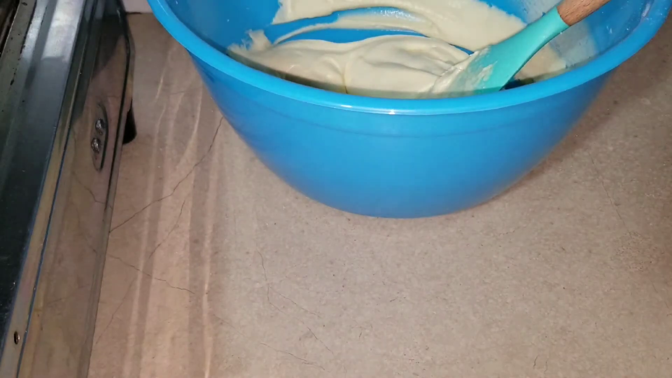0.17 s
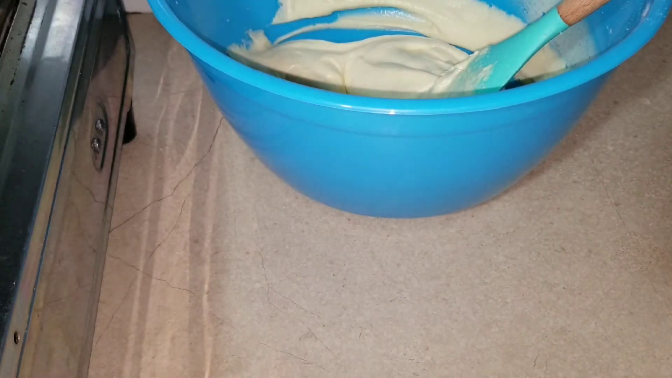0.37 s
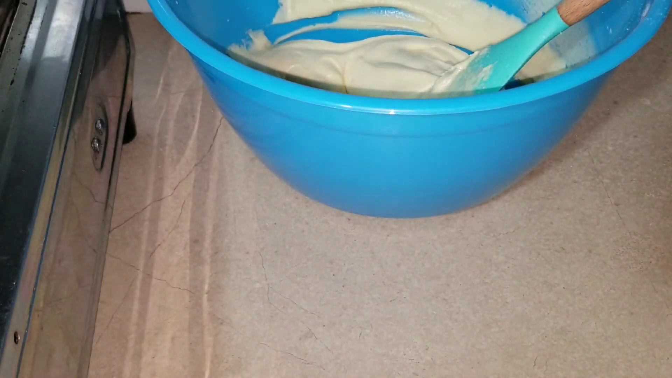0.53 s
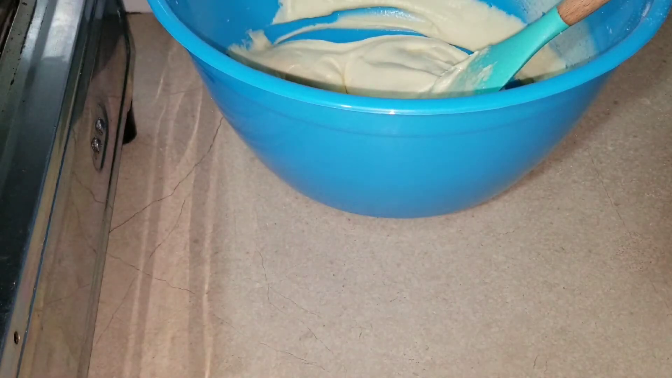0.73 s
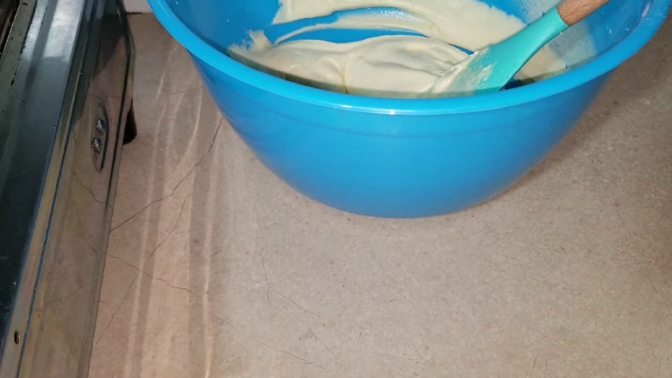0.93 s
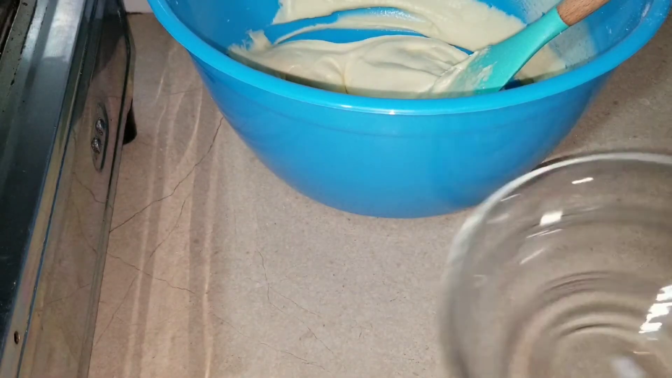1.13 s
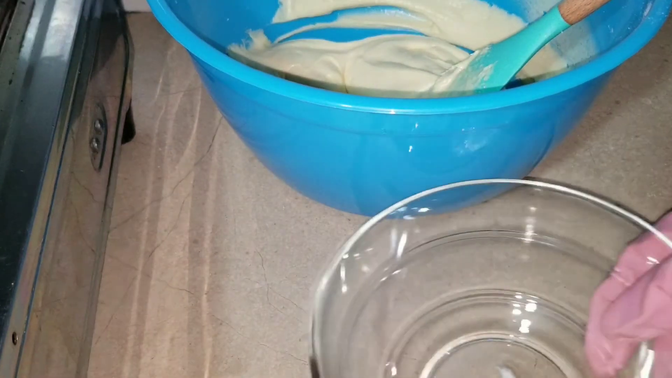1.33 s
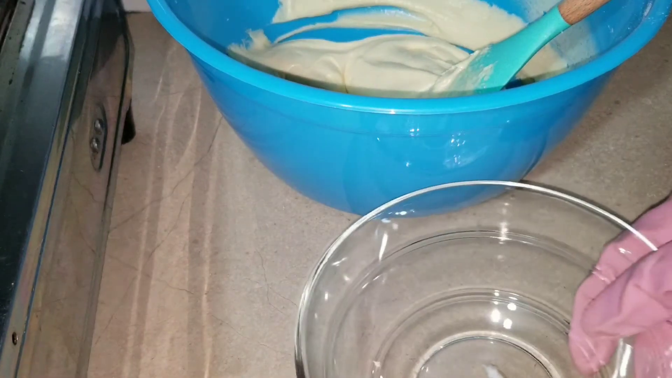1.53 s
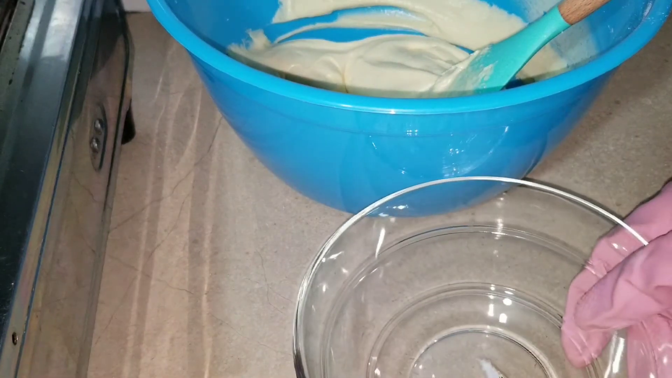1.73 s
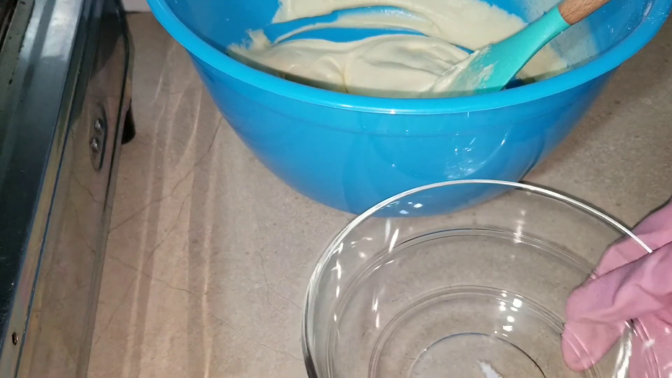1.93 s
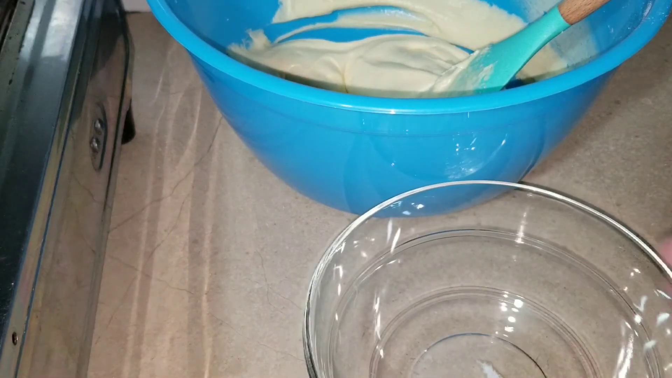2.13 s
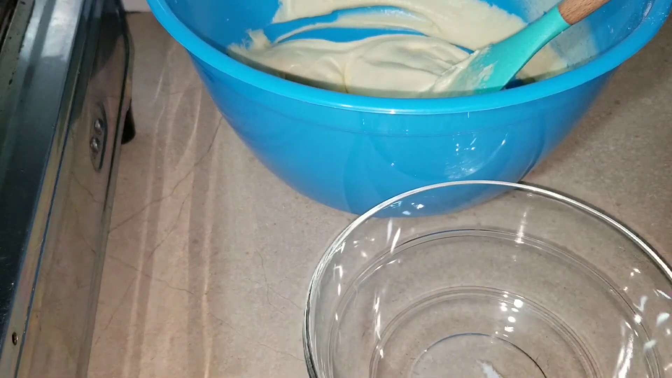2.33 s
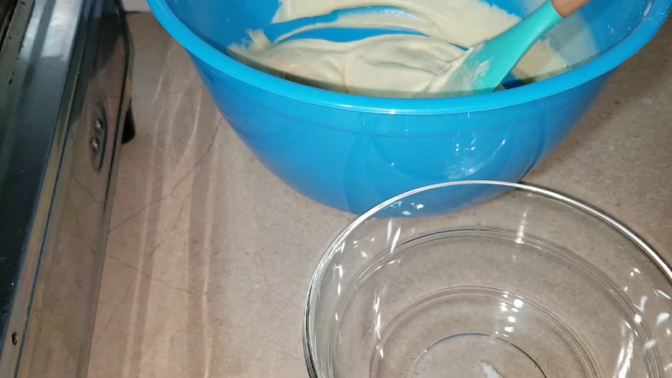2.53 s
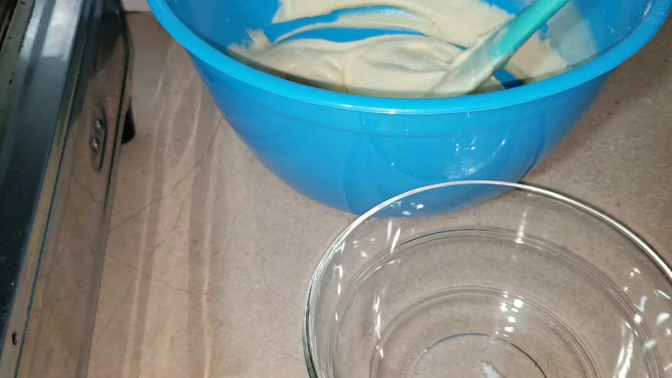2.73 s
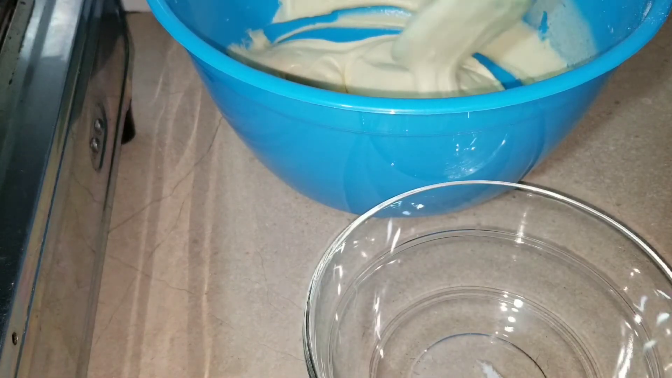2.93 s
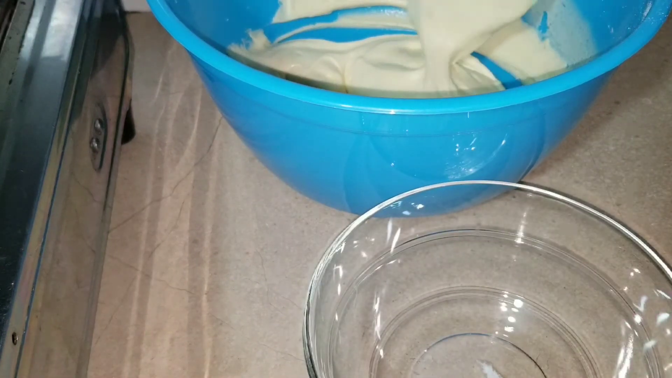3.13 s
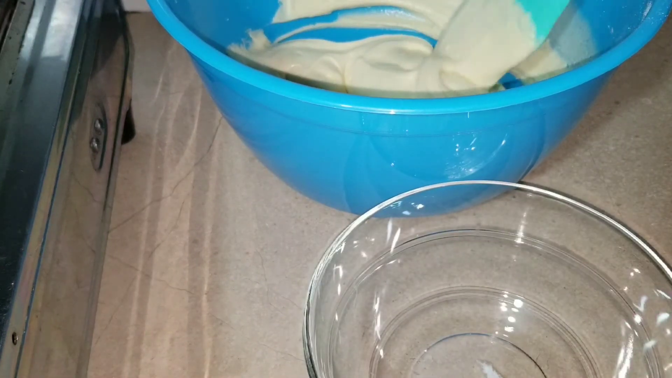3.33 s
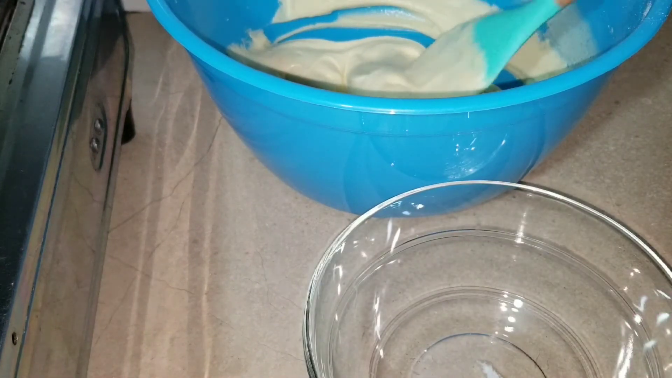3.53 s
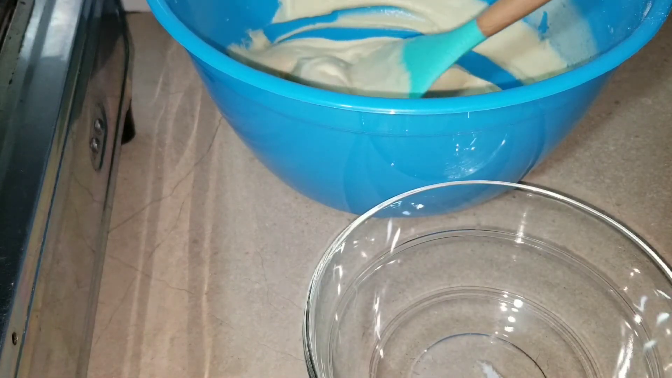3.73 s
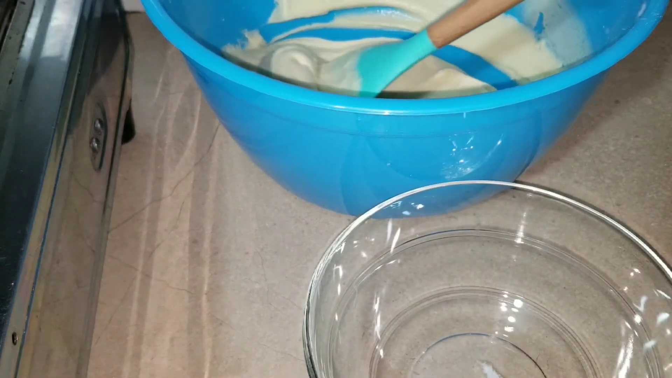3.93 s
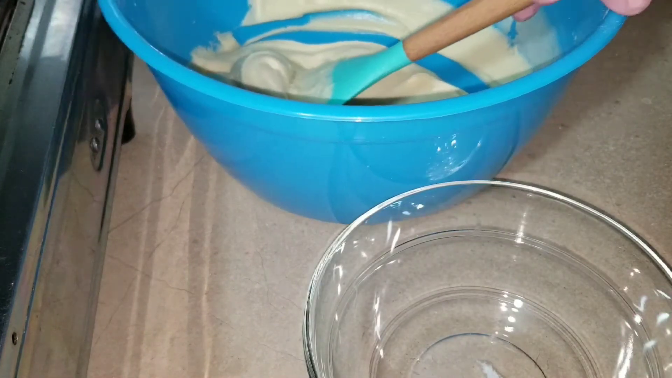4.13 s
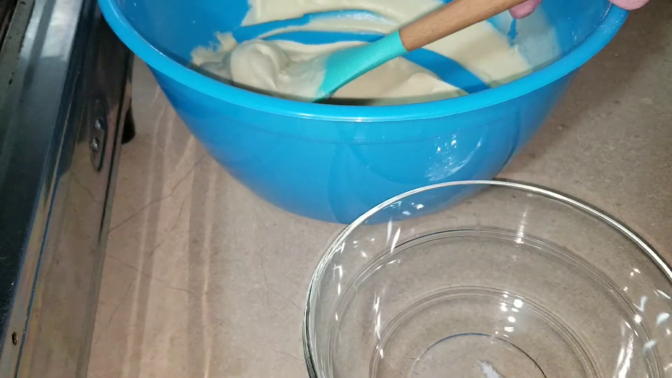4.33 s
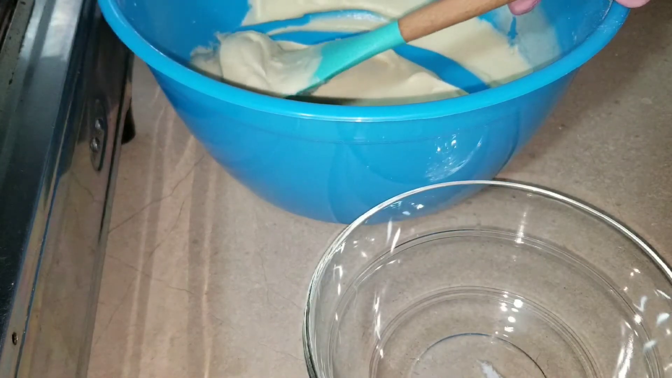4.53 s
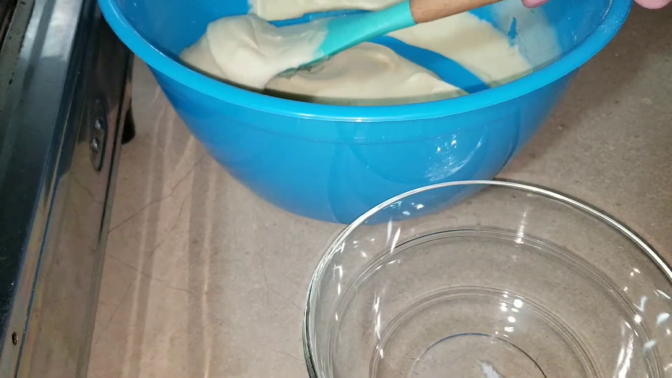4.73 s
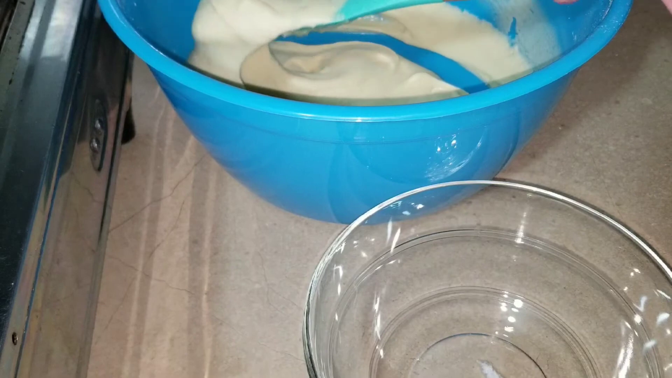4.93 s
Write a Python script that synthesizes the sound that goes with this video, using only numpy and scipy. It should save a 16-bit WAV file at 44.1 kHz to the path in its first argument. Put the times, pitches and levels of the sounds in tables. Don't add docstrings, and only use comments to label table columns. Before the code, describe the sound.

Faint fridge throbbing, building hum and a passing vehicle's low drone come first. Then a heavy glass bowl rattles down onto a solid counter, hard knocks crowding together with short high ringing, and settles once more. Afterwards come light glove rustles, little ticks, two dull thuds of a spatula in a plastic bowl and a short soft wipe. Small indoor room, close stereo microphone, sources right of centre.

```python
import sys
import numpy as np
from scipy import signal
from scipy.io import wavfile

SR = 44100
rng = np.random.default_rng(int(sys.argv[2]) if len(sys.argv) > 2 else 0)


def gain_from_decibels(decibels):
    exponent = np.asarray(decibels, float) / 20
    return 10 ** exponent


def digitize_waveform(pressure):
    field = np.atleast_2d(pressure).T
    bounded = np.clip(field, -1, 1)
    quanta = np.round(bounded * 32767).astype(np.int16)
    wavfile.write(sys.argv[1], SR, quanta)


N = 223656

# time in seconds, level in dB.
TRAFFIC = [(0, -50), (.5, -48.5), (.75, -52.5), (1.3, -54), (2.0, -51), (2.4, -51), (2.65, -55),
           (3.5, -53.5), (4.5, -54.5), (5.07, -51.5)]
# frequency in Hz, level in dB per Hz.
RUMBLE_COLOUR = [(12, -46), (20, -10.5), (49, -4.5), (75, -4), (115, -3.5), (178, -21), (201, -11.5),
                 (256, -6.5), (295, -18), (345, -7), (383, -17), (582, -13), (705, -22.5), (826, -29.5),
                 (1300, -64), (1690, -76), (2860, -120)]
HISS_COLOUR = [(530, -38), (900, -2), (1370, -12), (1840, -4), (1990, -5), (4300, -5.5), (5970, -11.5),
               (12600, -5), (13500, -16)]
HISS_DB = -80
# frequency in Hz, likeness (1 is identical).
LIKENESS = [(60, 0.98), (150, 0.84), (370, 0.89), (900, -0.74), (2220, 0.081), (5480, -0.28), (13500, -1.1)]
# frequency in Hz, left minus right in dB.
LEAN = [(60, -3.5), (180, -1), (520, -8.5), (1550, -0.5), (4580, -3.5), (13500, 0)]
HUM_HZ = [51.86, 98.7, 122.7]
# middle in seconds, length in seconds, level in dB.
HUM_SWELLS = [
    [(.27, .4, -50), (1.0, .2, -62), (1.38, .15, -57), (1.85, .3, -57), (2.4, .17, -50), (2.7, .25, -47),
     (3.3, .4, -49), (3.65, .3, -47), (4.25, .6, -57), (5.0, .4, -52)],
    [(.35, .35, -53), (1.0, .2, -68), (2.57, .2, -44), (3.05, .35, -49), (3.4, .15, -52), (4.97, .15, -53)],
    [(.42, .5, -47), (1.0, .25, -62), (1.82, .15, -48), (2.28, .15, -49), (2.62, .22, -44),
     (3.15, .15, -49), (4.0, .3, -57), (4.6, .3, -55)],
]
# frequency in Hz, width in Hz, level in dB.
FRIDGE_TONES = [(201.1, 24, -66.5), (254.4, 10, -70), (571, 4.7, -80)]
# seconds into the turn, level in dB.
PUMP_KNOCKS = [(.015, -61), (.027, -60), (.054, -56), (.076, -61)]
# frequency in Hz, level in dB, 60 dB decay in seconds, left minus right in dB.
PUMP_CASING = [(95, 3.0, .12, -2.5), (215, 1.5, .12, -.6), (510, -6, .07, -5), (580, 1.5, .06, -8)]
PUMP_TURNS_PER_S, PUMP_SOFT_HZ = 10.36, 720
# time in seconds, firing frequency in Hz, level in dB.
ENGINE = [(0, 41.84, -53), (.3, 41.45, -48.5), (.6, 40.71, -55.5), (.9, 39.15, -55), (1.2, 38.64, -55),
          (1.5, 38, -71)]
# multiple of the firing frequency, level in dB.
ENGINE_ORDERS = [(3, 0), (4, -3), (5, -6), (6, -8), (7, -8), (8, -14), (9, -12), (10, -12), (12, -13)]
# peak in seconds, level in dB, crackly top relative to the body in dB.
RUSTLES = [(0, -69, 4), (.15, -79, 6), (.33, -79, 3), (.5, -79, 3), (.59, -77, 3), (1.1, -97, 17),
           (1.58, -68, -2), (1.87, -66, -6), (2.03, -76, 3), (2.2, -74, 7), (2.42, -66, -4), (2.6, -83, 8),
           (2.75, -85, 7), (2.92, -80, 4), (3.17, -75, -5), (3.43, -75, 0), (3.6, -82, -3), (3.96, -70, -7),
           (5.06, -75, -8)]
RUSTLE_RISE, RUSTLE_FALL, RUSTLE_REST_DB = 130, 95, -95
# full pressure from and until in seconds, level in dB, rise and fall in dB per second.
WIPE = (3.872, 4.012, -50.5, 380, 320)
# frequency in Hz, level in dB per Hz.
WIPE_COLOUR = [(650, -38), (1100, -15), (1780, -12), (1880, -3), (4070, -6.5), (4860, -2.5), (11900, -1),
               (13400, 2)]
# start in
# seconds, peak in dB, body frequency in Hz, top relative to the peak in dB, contact length in seconds.
TOUCHES = [(2.0313, -44, 1680, -27, .0019), (2.1535, -46.5, 2085, -11, .0023),
           (2.171, -44.5, 2110, -14.5, .0016), (2.2247, -46.5, 2780, -19, .0015),
           (2.3495, -55.5, 2260, -17, .0031), (2.385, -35, 1960, -4.5, .0016), (2.419, -49.5, 1700, -9, .0027),
           (2.485, -59, 2010, -16, .002), (3.321, -61, 2660, -22, .0014), (3.3907, -40, 2350, -36, .0028),
           (3.436, -52, 1950, -17, .006), (3.4727, -37.5, 2100, -22, .0003), (5.022, -60, 1843, -21, .0042),
           (0.556, -59, 1080, -7, .014),
    (1.059, -55.5, 6800, -7.5, .013),
    (3.097, -24, 1010, -24, .0028),
]
# time in seconds, left minus right in dB.
HAND_SIDE = [(.6, -13), (1.1, -3), (2.2, -11.5), (3.1, -8), (5, -4)]
# start in seconds, frequency in Hz, level in dB, 60 dB decay in seconds.
TICKS = [
    (.325, 1850, -62, 0.072),
    (0.486, 1760, -59, 0.068),
    (.6, 8450, -61.5, 0.13),
    (1.984, 7800, -63, .03),
]
# start in seconds, peak in dB.
SPATULA_THUDS = [
    (3.099, -32.5),
    (3.393, -36.5),
]
# frequency in Hz, level in dB, 60 dB decay in seconds.
PLASTIC = [(263, -2, 0.0983), (453, 0.5, 0.066), (578, -9, 0.1), (1700, -2, 0.03), (2850, 4, 0.022)]
# frequency in Hz, 60 dB decay in seconds.
KITCHEN_T60 = [(150, 0.3), (600, 0.24), (1500, 0.24), (4000, 0.24), (10000, 0.0746)]
# frequency in Hz, level in dB.
KITCHEN_COLOUR = [(400, 0.0), (600, -3.5), (850, -2.5), (1200, 2.5), (2200, 0.0), (3400, -1.0), (6000, 1.0)]
# time in seconds, knock level in dB, knock frequency in Hz.
BOUNCES = [(1.4465, -12.5, 950), (1.4975, -12, 960), (1.5265, -15, 940), (1.547, -18.5, 940),
           (1.560, -18.5, 900), (1.5745, -24, 800), (1.8125, -15, 1070), (1.8155, -16, 1100),
           (1.821, -21, 1050), (1.830, -23, 1000), (1.8415, -23, 930), (1.849, -25, 930)]
# multiple of the knock frequency, level in dB.
COUNTER = [(.45, -13.5), (.7, -16.5), (1, 2.5), (1.3, -7), (1.65, -6), (2.0, 0), (2.5, -8), (3.3, -7)]
COUNTER_CYCLES = 8
# time in seconds, left minus right in dB.
BOWL_SIDE = [(1.5, -8), (1.8, -5.5)]
SLAP_S, SLAP_DB = 0.0051, -5
# time in seconds, peak in dB.
THUMPS = [
    (1.446, -22),
    (1.496, -31.5),
    (1.524, -34),
    (1.812, -54),
]
# frequency in Hz, level in dB, 60 dB decay in seconds.
CABINET = [(127.4, -2, .35), (215, -19, 0.75), (334, -10, 0.1984), (521.6, -10, 0.1)]
# time in seconds, crack level in dB, then low, middle and top family in dB.
CLINKS = [
    (1.448, -35, -50, -56, -40),
    (1.4986, -35.5, -41, -66, -46.5),
    (1.528, -30.5, -34.5, -36, -42),
    (1.815, -30.5, -36, -53, -33.5),
    (1.820, -40, -48.5, -52.5, -46.5),
]
# frequency in Hz, level in dB, 60 dB decay in seconds.
GLASS = [
    [(4830, -22, .05), (5552, -1, .165), (5615, -5, .13), (5800, -9, .04), (6900, -18, .03)],
    [(7550, -16, .1), (8430, 0, .15), (8520, -4, .18)],
    [(9420, -10, .16), (9800, -5, .1), (10000, -1, .14), (11200, -3, .1), (12040, -6, .08),
     (12370, -10, .1)],
]
# frequency in Hz, level in dB, 60 dB decay in seconds.
RIM = [(340, -52, 1.4), (708, -44, .6), (1585, -39, .4)]
RELEASE_S = 1.882
LEFT_LAG = 6
STEP_HZ, STEP_DB, CUTOFF_HZ = 7750, -5, 13200


def rms_one(x):
    return x / np.sqrt(np.mean(x ** 2) + 1e-20)


def in_time(rows):
    s, *columns = np.transpose(rows)
    return [np.interp(np.arange(N) / SR, s, column) for column in columns]


def at_hz(points, hz):
    known_hz, values = np.transpose(points)
    return np.interp(np.log(hz), np.log(known_hz), values)


def pan(db):
    return gain_from_decibels(np.multiply.outer([.5, -.5], db))


def drift(rate):
    r = np.exp(-80 * np.pi * rate / SR)
    slow = signal.lfilter([1], [1, -2 * r, r * r], rng.standard_normal(N // 40 + 2002))[2000:]
    return np.interp(np.arange(N) / 40, np.arange(len(slow)), rms_one(slow - slow.mean()))


def swell(start, end, db, rise, fall):
    t = np.arange(N) / SR
    early, late = np.clip(start - t, 0, 9), np.clip(t - end, 0, 9)
    return gain_from_decibels(db - rise * early - fall * late)


def ring(x, hz, t60):
    r, w = gain_from_decibels(-60 / (t60 * SR)), 2 * np.pi * hz / SR
    return signal.lfilter([0, np.sin(w)], [1, -2 * r * np.cos(w), r * r], x + 1e-18)


def strike(times, gains, modes, spread_db):
    at, out = np.round(np.asarray(times) * SR).astype(int), np.zeros((2, N))
    luck = rng.standard_normal((len(at), len(modes), 3))
    for k, (hz, db, t60) in enumerate(modes):
        uneven_db = spread_db * (luck[:, k, 0] + .7 * luck[:, k, 1:].T)
        clicks = np.zeros((2, N))
        clicks[:, at] = gains * gain_from_decibels(db + uneven_db) * (-1) ** k
        out += ring(clicks, hz, t60)
    return out


def coloured(spectrum, patchy_db):
    first, last = spectrum[0][0], min(spectrum[-1][0], 14000)
    edges = np.geomspace(first, last, round(3 * np.log2(last / first)) + 1)
    out, white = 0, rng.standard_normal((2, 2, N))
    for k, (low, high) in enumerate(zip(edges, edges[1:])):
        band = signal.butter(2, [low, high], "band", fs=SR, output="sos")
        mid, side = signal.sosfilt(band, white[k % 2])
        hz = np.sqrt(low * high)
        alike = np.clip(at_hz(LIKENESS, hz), 0, 1)
        gain = gain_from_decibels(at_hz(spectrum, hz) + patchy_db * drift(9)) * pan(at_hz(LEAN, hz))[:, None]
        out = out + gain * (np.sqrt(1 + alike) * mid + np.sqrt(1 - alike) * side * [[1], [-1]])
    return rms_one(out)


def traffic_and_hiss():
    rumble = gain_from_decibels(in_time(TRAFFIC)[0]) * coloured(RUMBLE_COLOUR, patchy_db=3.0)
    return rumble + gain_from_decibels(HISS_DB + 5) * coloured(HISS_COLOUR, patchy_db=.7)


def building_hum():
    t, out = np.arange(N) / SR, 0
    for hz, rows in zip(HUM_HZ, HUM_SWELLS):
        turn = 2 * np.pi * np.cumsum(hz * (1 + 0.036 * drift(6))) / SR
        tone = np.sqrt(2) * gain_from_decibels(0.92 * drift(10)) * np.sin(turn) * pan(-2.0)[:, None]
        gain = sum(gain_from_decibels(db - np.minimum(24 * ((t - s) / length) ** 2, 200)) for s, length, db in rows)
        out = out + gain_from_decibels(-1.8) * gain * tone
    return out


def fridge_tones():
    out = 0
    for hz, width_hz, db in FRIDGE_TONES:
        noise = rng.standard_normal(N) + 0.25 * rng.standard_normal((2, N))
        t60 = np.log(1000) / (np.pi * width_hz)
        out = out + gain_from_decibels(db) * rms_one(ring(ring(noise, hz, t60), hz, t60))
    return out


def fridge_pump():
    turns = np.arange(-2, N / SR * PUMP_TURNS_PER_S) / PUMP_TURNS_PER_S
    s, db = np.transpose(PUMP_KNOCKS)
    at = ((turns[:, None] + s + 1) * SR).astype(int)
    clicks = np.zeros(N + 2 * SR)
    clicks[at] = gain_from_decibels(db + 1.5 * rng.standard_normal(at.shape))
    clicks = signal.sosfilt(signal.butter(6, PUMP_SOFT_HZ, fs=SR, output="sos"), clicks + 1e-18)
    out = 0
    for hz, level_db, t60, side_db in PUMP_CASING:
        out = out + gain_from_decibels(level_db) * pan(side_db)[:, None] * ring(clicks, hz, t60)[SR:SR + N]
    return out


def engine():
    hz, db = in_time(ENGINE)
    turn = 2 * np.pi * np.cumsum(hz * (1 + 0.0048 * drift(3.7))) / SR
    orders = sum(gain_from_decibels(level + 2.5 * drift(4)) * np.sin(k * turn + k * k) for k, level in ENGINE_ORDERS)
    return gain_from_decibels(db) * orders * pan(-1.71)[:, None]


def glove_rustle():
    moves = [swell(s, s, db, RUSTLE_RISE, RUSTLE_FALL) for s, db, _ in RUSTLES]
    body = gain_from_decibels(RUSTLE_REST_DB) + sum(moves)
    top = gain_from_decibels(RUSTLE_REST_DB + 3.0) + sum(gain_from_decibels(row[2]) * move for move, row in zip(moves, RUSTLES))
    body_noise = coloured([(900, -0.5), (1800, 5.5), (2800, -4), (4000, -6)], patchy_db=.7)
    top_noise = coloured([(3080, -9.5), (5000, -4.5), (7500, -3.5), (9500, -11), (13900, -2.5)], patchy_db=.7)
    return gain_from_decibels(2.5) * body * body_noise + gain_from_decibels(0.6) * top * top_noise


def spatula_wipe():
    return swell(*WIPE) * coloured(WIPE_COLOUR, patchy_db=1.3)


def touches():
    out, t = np.zeros((2, N)), np.arange(SR // 8) / SR
    top = signal.butter(2, [3000, 7600], "band", fs=SR, output="sos")
    for s, db, hz, top_db, length in TOUCHES:
        rough = rng.standard_normal((2, len(t))) * t * np.exp(-t / max(length, 2e-4))
        body = ring(rough[0], hz, 7 / hz) + .45 * ring(rough[0], 1.3 * hz, 4 / hz)
        scratch = signal.sosfilt(top, rough[1])
        touch = body / np.abs(body).max() + gain_from_decibels(top_db + 2.5) * scratch / np.abs(scratch).max()
        sides = pan(np.interp(s, *np.transpose(HAND_SIDE)))[:, None]
        at = round(s * SR)
        out[:, at:at + len(t)] += (gain_from_decibels(db) * sides * touch)[:, :N - at]
    for s, *mode in TICKS:
        out += strike([s], pan([-8.0]), [mode], spread_db=0)
    s, db = np.transpose(SPATULA_THUDS)
    return out + strike(s, gain_from_decibels(db - 7.5) * pan(0 * s - 3), PLASTIC, spread_db=0.5)


def kitchen(x):
    t, tail = np.arange(SR // 2) / SR, 0
    for low in 90 * 2 ** np.arange(0, 7.1, .5):
        band = signal.butter(2, [low, low * np.sqrt(2)], "band", fs=SR, output="sos")
        mid, side = signal.sosfilt(band, rng.standard_normal((2, len(t))))
        pair = mid + np.clip(low / 500, 0, 1) * side * [[1], [-1]]
        tail = tail + pair * gain_from_decibels(at_hz(KITCHEN_COLOUR, low * 2 ** .25) - 60 * t / at_hz(KITCHEN_T60, low))
    tail = tail * np.clip((t - .002) / .003, 0, 1) * (1 + 1.2 * np.exp(-t / .012))
    return signal.fftconvolve(x, tail / np.sqrt(np.sum(tail ** 2) / 2), axes=1)[:, :N]


def cabinet_boom():
    s, db = np.transpose(THUMPS)
    boom = strike(s + .003, gain_from_decibels(db - 4.5) * pan(0 * s - 3), CABINET, spread_db=-3.5)
    return signal.lfilter([.08], [1, -.92], boom)


def counter_knocks():
    out = np.zeros((2, N))
    push = np.pad(np.hanning(18), (0, 2000))
    for s, db, hz in BOUNCES:
        modes = []
        for k, level_db in COUNTER:
            t60 = COUNTER_CYCLES / (k * hz)
            modes.append(gain_from_decibels(level_db) * k * ring(ring(push, k * hz, t60), k * hz, t60))
        body = sum(modes[::2]) - sum(modes[1::2])
        at = round(s * SR)
        out[:, at:at + len(body)] -= gain_from_decibels(db) * body / np.abs(body).max()
    out *= pan(in_time(BOWL_SIDE)[0])
    lag = round(SLAP_S * SR)
    out[:, lag:] += gain_from_decibels(SLAP_DB) * out[::-1, :-lag]
    return out


def glass_bowl():
    s, crack_db, *families_db = np.transpose(CLINKS)
    gains = gain_from_decibels(np.array(families_db))
    wall = sum(strike(s, gain, modes, spread_db=1.5) for gain, modes in zip(gains, GLASS))
    crack_colour = [(4000, -1.5), (6500, -9), (12500, -3)]
    grit = [(hz, at_hz(crack_colour, hz), .006) for hz in np.geomspace(3000, 12500, 9)]
    crack = strike(s, gain_from_decibels(crack_db), grit, spread_db=2.5)
    rim = strike([RELEASE_S], 1, RIM, spread_db=0)
    return np.array([crack, wall + rim]) * pan(.5 * in_time(BOWL_SIDE)[0])


def scene():
    background = traffic_and_hiss() + building_hum() + fridge_tones() + fridge_pump() + engine()
    hand, knock, (crack, ringing) = touches(), counter_knocks(), glass_bowl()
    room = kitchen(gain_from_decibels(-3) * knock + gain_from_decibels(-3) * crack + gain_from_decibels(-14) * ringing + gain_from_decibels(-4) * hand)
    near = knock + cabinet_boom() + crack + ringing + hand
    near[0] = np.roll(near[0], LEFT_LAG)
    return background + glove_rustle() + spatula_wipe() + near + room


def top_cut(x):
    return signal.sosfilt(signal.butter(12, 14130, fs=SR, output="sos"), x)


def record(dry):
    upper = signal.sosfiltfilt(signal.butter(8, STEP_HZ, "high", fs=SR, output="sos"), dry)
    stepped = dry - (1 - gain_from_decibels(STEP_DB)) * upper
    mix = signal.sosfilt(signal.cheby2(10, 60, CUTOFF_HZ + 1100, fs=SR, output="sos"), stepped)
    return top_cut(mix)


dry = scene()
out = record(dry)
digitize_waveform(out)
```